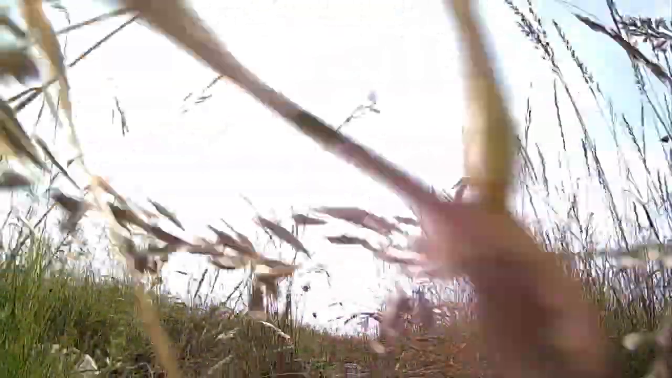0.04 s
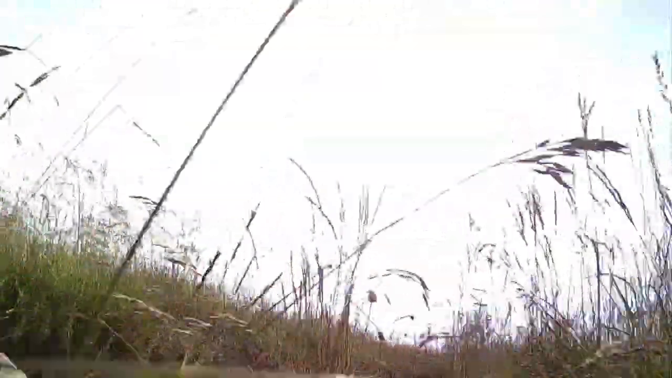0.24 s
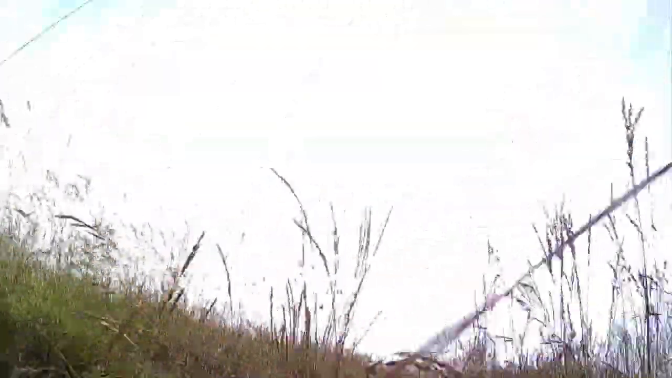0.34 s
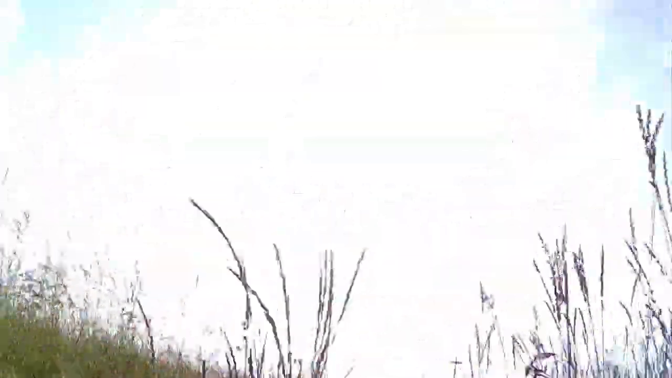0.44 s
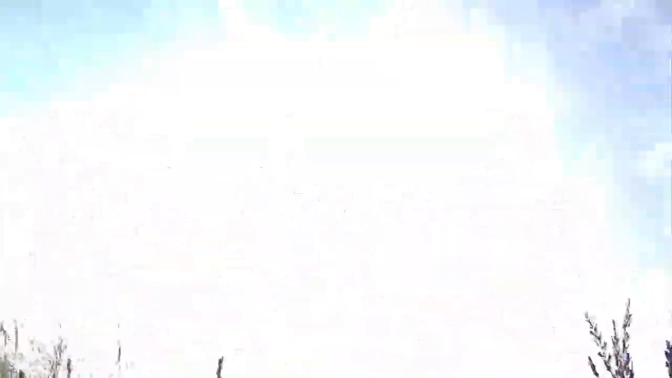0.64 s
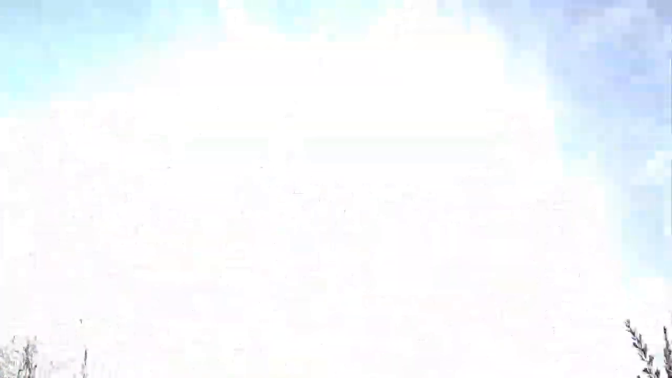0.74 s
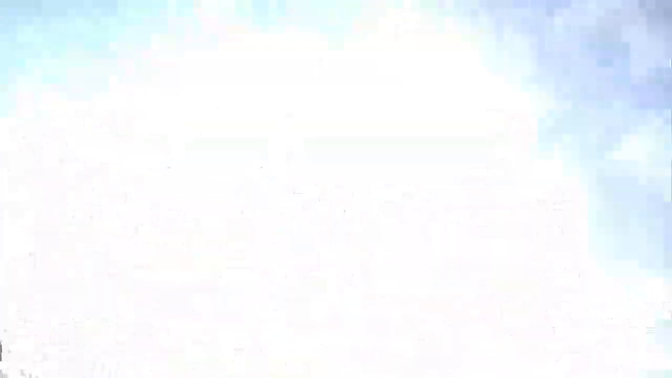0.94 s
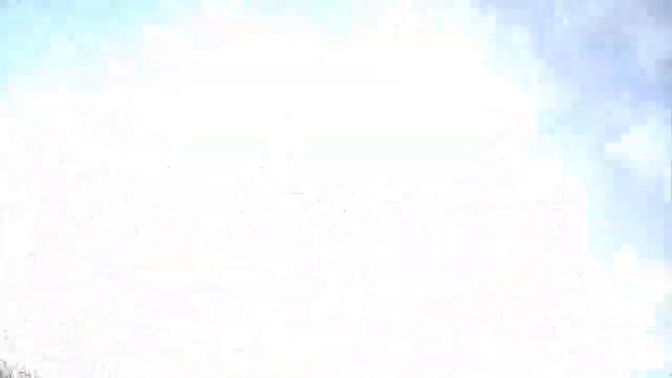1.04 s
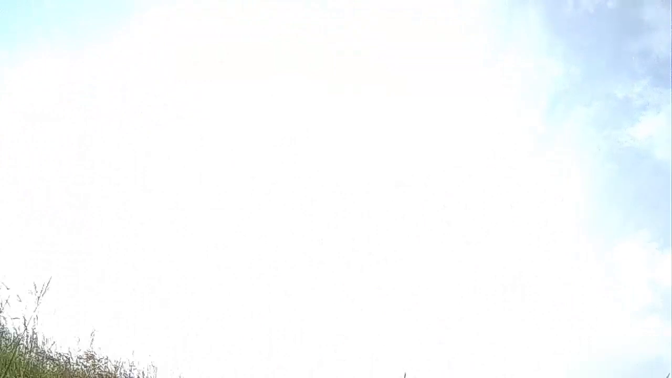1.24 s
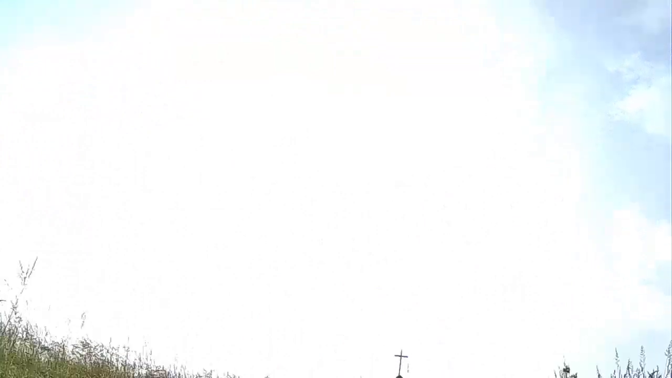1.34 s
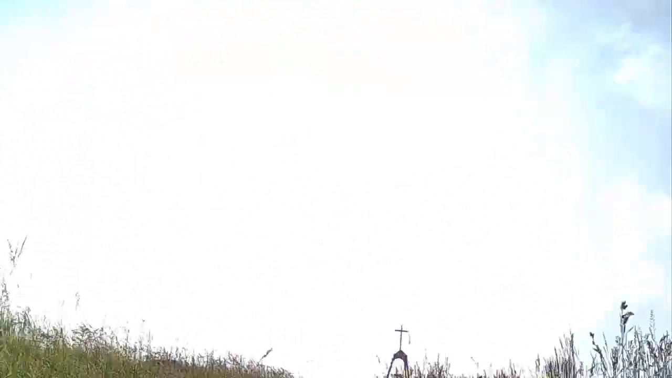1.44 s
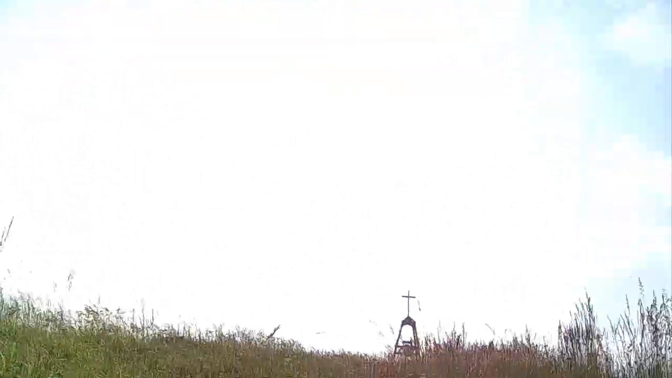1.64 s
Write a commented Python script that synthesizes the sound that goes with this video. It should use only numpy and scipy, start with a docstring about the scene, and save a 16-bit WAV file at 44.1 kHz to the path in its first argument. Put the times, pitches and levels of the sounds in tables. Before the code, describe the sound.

Dry grass stalks snap, knock and scrape over a small camera's plastic shell, then clear to faint wind

```python
"""Tall dry grass snaps, rubs and scrapes over the plastic shell of a small camera carried through a meadow.
Each touch is a burst of stick-slip impulses, rung through the shell as a hollow knock and a dry crack.
Decaying sines make the bumps of heavier stalks; treble noise makes a seed head sliding past.
Low noise is the body's thrum and the wind on the port; a faint steady hiss lies under it all.
Once the grass has cleared, a few last tips tick over wind, hiss and a trace of scrape."""
import sys
import numpy as np
from scipy import signal
from scipy.fft import rfft, irfft, next_fast_len
from scipy.io import wavfile
from scipy.ndimage import uniform_filter1d, minimum_filter1d, map_coordinates

SR = 44100
rng = np.random.default_rng(int(sys.argv[2]) if len(sys.argv) > 2 else 0)


def persist_wave(psi):
    """Save psi, clipped to +-1, as 16-bit WAV."""
    counts = np.round(np.clip(psi, -1, 1) * 32767).astype(np.int16)
    wavfile.write(sys.argv[1], SR, np.atleast_2d(counts).T)


N = 72765  # length in samples
SIZE = 4096  # samples in one touch and in the shell's filter
TOUCH_T = np.arange(SIZE) / SR  # seconds within a touch
TOUCH_HZ = np.fft.rfftfreq(SIZE, 1 / SR)
SNAP_SLIPS_PER_S, SCRAPE_SLIPS_PER_S, SLIP_SPREAD_DB = 7000, 1500, 4.5
FLUTTER_DB, FLUTTER_PER_S = 3, 170  # unsteady pressure of the scrape and the seed head


def amp(db):
    """Decibels to gain."""
    return 10 ** (np.asarray(db) / 20)


def unit(x):
    """Scale to rms 1."""
    return x / np.sqrt(np.mean(x ** 2) + 1e-20)


def along(points, hz):
    """Read (Hz, value) points on a log frequency axis."""
    f, v = np.transpose(points)
    return np.interp(np.log(hz + 1), np.log(f + 1), v)


def curves(rows):
    """One value per sample for each column after the time."""
    s, *cols = np.transpose(rows)
    t = np.arange(N) / SR
    return [np.interp(t, s, col) for col in cols]


def wobble(rate):
    """A smooth random curve, rate knots a second."""
    return map_coordinates(rng.standard_normal(N), [np.arange(N) * rate / SR])


def noise(colour):
    """Noise of rms 1, its spectrum shaped by (Hz, dB) points."""
    spectrum = rfft(rng.standard_normal(N))
    gain = amp(along(colour, np.fft.rfftfreq(N, 1 / SR)))
    return unit(irfft(spectrum * gain, N))


def ring(x, gain):
    """Pass x through the minimum-phase filter with this gain, so that the ringing follows the blow."""
    cepstrum = irfft(np.log(np.maximum(gain, 1e-6)))
    cepstrum[1:SIZE // 2] *= 2
    cepstrum[SIZE // 2 + 1:] = 0
    response = irfft(np.exp(rfft(cepstrum)))
    return signal.fftconvolve(x, response)[:len(x)]


def add(track, s, x):
    """Mix x into the track at s seconds."""
    i = max(0, round(s * SR))
    track[i:i + len(x)] += x[:max(0, N - i)]


# Wind on the port. Each row: time in seconds, level in dB.
WIND = [(0, -36.5), (.5, -41), (1.03, -41), (1.27, -33.5), (1.65, -39)]
# Colour of the wind, nearly all deep bass. Each row: frequency in Hz, relative level in dB.
WIND_COLOUR = [(12, -16.5), (36, -0.5), (100, -31.5), (180, -31), (600, -80.5)]
# Colour of the hiss, falling to the treble. Each row: frequency in Hz, relative level in dB.
HISS_FLOOR_COLOUR = [(200, 0), (700, -6), (1400, -11.5), (2100, -12), (9500, -18), (16000, -23)]
HISS_FLOOR_DB = -56


def air():
    """Wind rumbles on the port as swelling low noise, over a faint steady hiss."""
    wind = amp(curves(WIND)[0]) * noise(WIND_COLOUR)
    return wind + amp(HISS_FLOOR_DB) * noise(HISS_FLOOR_COLOUR)


# The camera body pushed by the grass. Each row: time in seconds, level in dB.
THRUM = [(0, -46), (.23, -41), (.45, -29.5), (.74, -39.5), (.87, -35), (.96, -63.5)]
# Colour of the thrum. Each row: frequency in Hz, relative level in dB.
THRUM_COLOUR = [(40, -5), (135, -8), (195, -1.5), (280, -24.5), (1500, -66)]


def thrum():
    """The camera body thrums while it is pushed: low noise that follows the push."""
    return amp(curves(THRUM)[0]) * noise(THRUM_COLOUR)


# Bumps of heavier stalks. Each row: start in seconds, pitch in Hz, level before the envelope in dB,
# decay time in seconds.
THUMPS = [(0.114, 192, -28, 0.013), (.292, 343, -15, .006), (0.577, 186, -23, 0.019),
          (0.673, 187, -21, 0.014), (0.808, 166, -15, 0.0033), (.857, 247, -3.5, 0.0013)]
THUMP_RISE_S, THUMP_WOBBLE_RAD = 0.00093, 0.17


def thumps():
    """A bump sets the body ringing low: a decaying sine with an unsteady phase."""
    out, t = np.zeros(N), np.arange(N) / SR
    for s, hz, db, decay in THUMPS:
        envelope = (1 - np.exp(-t / THUMP_RISE_S)) * np.exp(-t / decay)
        phase = 2 * np.pi * hz * t + THUMP_WOBBLE_RAD * wobble(hz)
        add(out, s, amp(db) * envelope * np.sin(phase))
    return out


# A seed head sliding past. Each row: time in seconds, level in dB before the flutter.
HISS = [(.24, -88), (.29, -42), (.51, -30.5), (.545, -36.5), (.57, -92)]
# Treble bands of its bristles. Each row: frequency in Hz, relative level in dB.
HISS_COLOUR = [(5500, -11.5), (7700, 10), (8600, -29), (12700, -8.5), (14200, -22)]


def hiss():
    """The fine bristles of a seed head brush by as fluttering treble noise that rises and dies away."""
    level_db = curves(HISS)[0] + FLUTTER_DB * wobble(FLUTTER_PER_S)
    return amp(level_db) * noise(HISS_COLOUR)


def slips(rate, size):
    """Tiny stick-slip impulses of uneven strength and random sign, rms 1."""
    hit = rng.random(size) < rate / SR
    sign = np.sign(rng.standard_normal(size))
    strength = amp(SLIP_SPREAD_DB * rng.standard_normal(size))
    return unit(hit * sign * strength)


STALK_COLOUR_DB, STALK_SPACING_HZ = 2.5, 394.6  # depth and spacing of the unevenness


def stalk():
    """The uneven resonances of one stalk, as a gain drawn afresh each time."""
    return amp(STALK_COLOUR_DB * map_coordinates(rng.standard_normal(SIZE), [TOUCH_HZ / STALK_SPACING_HZ]))


# Broad colour of the plastic shell. Each row: frequency in Hz, gain in dB.
SHELL = [(200, -9), (950, -6), (2100, -4.5), (4200, -7.5), (9000, -21.5), (14000, -35.5)]
# Resonances of the shell. Each row: frequency in Hz, width in Hz, lift in dB.
RESONANCES = [(1224, 120, 4.5), (1547, 62, 5.5), (2862, 57, 2.5), (3890, 370, 6.5), (4860, 330, 4.5),
              (10030, 920, 5.5)]
CONTACT_DB, CONTACT_OCTAVES = 9, 0.46  # lift around the knock's centre: height, width
KNOCK_REACH = 1.35  # the knock rolls off above this multiple of its centre
CRACK_LOW_HZ = 2250  # highest corner below which the crack rolls off
CRACK_CENTRE_HZ = 4200  # pivot of the crack's brightness


def shell(centre_hz, tilt_db):
    """Gains of the shell's hollow knock, lifted by the place of contact, and of the dry crack above it."""
    hz = TOUCH_HZ + 1
    resonance_db = sum(db / (1 + (2 * (hz - f) / width) ** 2) for f, width, db in RESONANCES)
    gain = amp(along(SHELL, hz) + resonance_db)
    edge_hz = KNOCK_REACH * centre_hz
    below = 1 / np.sqrt(1 + (hz / edge_hz) ** 10)
    above = 1 / np.sqrt(1 + (min(CRACK_LOW_HZ, edge_hz) / hz) ** 10)
    place = amp(CONTACT_DB * np.exp(-(np.log2(hz / centre_hz) / CONTACT_OCTAVES) ** 2))
    knock = gain * place * below
    crack = gain * amp(tilt_db * np.log2(hz / CRACK_CENTRE_HZ)) * above
    return knock, crack


STALK_LOW_HZ = 557  # a light stalk pushes little below this


def touch(forces, length_s, knock_db, centre_hz, crack_db, tilt_db):
    """One contact sets off knock and crack together, tinted by the stalk."""
    hz = TOUCH_HZ + 1
    tint = stalk() * hz / np.hypot(hz, STALK_LOW_HZ)
    knock_gain, crack_gain = shell(centre_hz, tilt_db)
    knock = amp(knock_db) * unit(ring(forces[0], knock_gain * tint))
    crack = amp(crack_db) * unit(ring(forces[1], crack_gain * tint))
    # count the levels over the contact instead of the whole window
    return (knock + crack) * np.sqrt(length_s * SR / SIZE)


# Steady drag of blades. Each row: time in seconds, level of the body in dB, level of the rasp in dB,
# both before the flutter.
SCRAPE = [(0, -49.5, -58.5), (.228, -47, -58.5), (.25, -35, -36.5), (.305, -26, -25.5), (.362, -30, -31),
          (.41, -25.5, -26), (.53, -24.5, -33), (.59, -34.5, -48), (.655, -45.5, -55), (.725, -39.5, -45.5),
          (.775, -34.5, -46), (.83, -35.5, -27.5), (.89, -34.5, -42), (.935, -64.5, -70.5)]
BLADE_COUNT, BLADE_S = 92, 0.0357  # blades in all, time each stays on the shell
SCRAPE_CENTRE_HZ, SCRAPE_TILT_DB = 1300, 0  # centre of the body, brightness of the rasp per octave


def scrape():
    """Blade after blade slides over the shell, each with its own colour, under a fluttering pressure."""
    body, rasp = np.zeros(N), np.zeros(N)
    arch = np.sqrt(np.maximum(TOUCH_T * (BLADE_S - TOUCH_T), 0))
    body_gain, rasp_gain = shell(SCRAPE_CENTRE_HZ, SCRAPE_TILT_DB)
    for s in np.linspace(0, N / SR, BLADE_COUNT):
        force = slips(SCRAPE_SLIPS_PER_S, SIZE) * arch
        tint = stalk()
        add(body, s, unit(ring(force, body_gain * tint)))
        add(rasp, s, unit(ring(force, rasp_gain * tint)))
    body_db, rasp_db = curves(SCRAPE)
    pressure = amp(FLUTTER_DB * wobble(FLUTTER_PER_S))
    return pressure * (amp(body_db) * unit(body) + amp(rasp_db) * unit(rasp))


# Stalks rubbing briefly along the shell. Each row: start in seconds, length in seconds, knock level in dB,
# knock centre in Hz, crack level in dB, brightness of the crack in dB per octave.
RUBS = [(0.099, 0.017, -35, 1240, -65, 5), (0.38, 0.014, -17, 1280, -20, -4),
        (0.446, 0.016, -31, 1620, -26, -8), (.817, 0.0045, -35, 1620, -18.5, 9.5),
        (0.829, 0.028, -20.5, 1770, -26.5, -4.5), (0.904, 0.016, -26.5, 1220, -39, 2),
        (1.32, .009, -51.5, 1410, -67.5, 4), (1.607, 0.026, -54, 1360, -67.5, 3)]


def rubs():
    """A stalk slides on the shell in a short arch of slips."""
    out = np.zeros(N)
    for s, length, *colour in RUBS:
        arch = np.sqrt(np.maximum(TOUCH_T * (length - TOUCH_T), 0))
        force = slips(SNAP_SLIPS_PER_S, SIZE) * arch
        add(out, s, touch([force, force], length, *colour))
    return out


# Stalks striking the housing. Each row: start in seconds, knock level in dB, knock centre in Hz,
# crack level in dB, brightness of the crack in dB per octave.
SNAPS = [(.0025, -26.5, 1210, -41, -1.5), (.032, -34, 1170, -41, -2.5), (.123, -29.5, 1317, -34, -4.5),
         (0.2352, -20, 880, -15, 3.5), (0.2563, -21.5, 1200, -21, 3), (0.2627, -20, 1190, -18, 4),
         (.281, -35, 1390, -25, -13), (0.2885, -17, 1430, -19, -6), (0.3077, -24, 1900, -24, 9),
         (.3252, -19, 1170, -17.5, 1), (0.336, -30, 1520, -18.5, 2), (0.3914, -13.5, 1590, -31, -10),
         (0.4101, -11, 1330, -24, 6), (0.4796, -20, 1280, -18.5, 0), (0.4992, -18, 1620, -21, 3.5),
         (0.5364, -15, 1190, -18, 4), (.543, -7.5, 1210, -17, -2), (0.5505, -8, 1050, -2, 1.5),
         (0.558, -11.5, 1380, -37.5, 7), (0.576, -24, 1450, -15.5, -1.5), (.605, -23.5, 1700, -37, -8.5),
         (0.6692, -21.5, 970, -34, -4.5), (.698, -31, 1270, -32, 7.5), (0.7014, -19, 1065, -20.5, -2.5),
         (0.71, -20, 1720, -22.5, 0.5), (0.7388, -19.5, 1530, -35.5, 3), (0.752, -23, 1280, -31.5, 4.5),
         (0.8081, -11.5, 1980, -12.5, 0.5), (0.8268, -9.5, 1610, -15.5, 1),
         (0.8411, -13.5, 1570, -22.5, 5.5), (0.8578, -6.5, 1660, -25, 3), (1.1463, -42.5, 1760, -36.5, -1),
         (1.171, -45, 1300, -46.5, 4), (1.188, -49, 1480, -29.5, -3)]
SNAP_LENGTH_S = 0.0035  # the time over which a snap's level is counted
FIRST_SLIP_DB = 16  # the first hard slip against the chatter
KNOCK_DECAY_S, CRACK_DECAY_S = 0.0045, 0.0029
SNAP_TAIL_S, TAIL_DB = 0.0124, -29  # a longer, fainter chatter behind both


def snaps():
    """A stalk hits with one hard slip and chatters briefly; the crack dies sooner than the knock."""
    out = np.zeros(N)
    first_slip = amp(FIRST_SLIP_DB) * signal.unit_impulse(SIZE)
    tail = amp(TAIL_DB) * np.exp(-TOUCH_T / SNAP_TAIL_S)
    for s, *colour in SNAPS:
        chatter = slips(SNAP_SLIPS_PER_S, SIZE)
        knock_force = first_slip + chatter * (np.exp(-TOUCH_T / KNOCK_DECAY_S) + tail)
        crack_force = first_slip + chatter * (np.exp(-TOUCH_T / CRACK_DECAY_S) + tail)
        add(out, s, touch([knock_force, crack_force], SNAP_LENGTH_S, *colour))
    return out


def scene():
    """Everything at the one microphone."""
    background = air() + thrum()
    grass = thumps() + hiss() + scrape() + rubs() + snaps()
    return (background + grass)[None]


LIMIT_DB, TOP_HZ = -0.4, 15950  # limiter ceiling re full scale, top of the band


def record(dry):
    """A fast limiter holds peaks just under full scale; then all at and above the top of the band is cut."""
    need = np.minimum(1, amp(LIMIT_DB) / (np.abs(dry) + 1e-9))
    limited = dry * uniform_filter1d(minimum_filter1d(need, size=61), size=61)
    m = next_fast_len(N + SIZE)
    in_band = np.fft.rfftfreq(m, 1 / SR) < TOP_HZ
    return irfft(rfft(limited, m) * in_band, m)[..., :N]


dry = scene()
out = record(dry)
persist_wave(out)
```